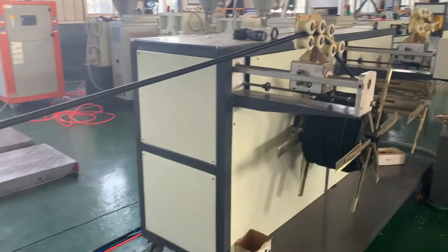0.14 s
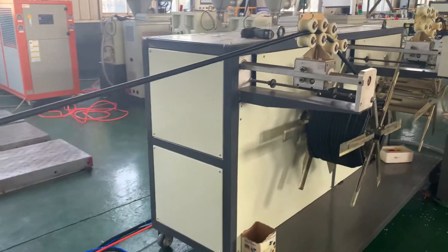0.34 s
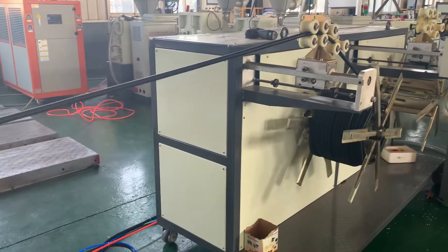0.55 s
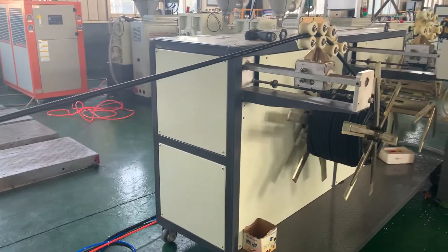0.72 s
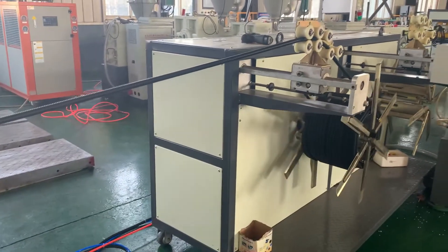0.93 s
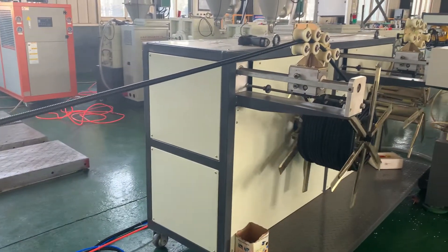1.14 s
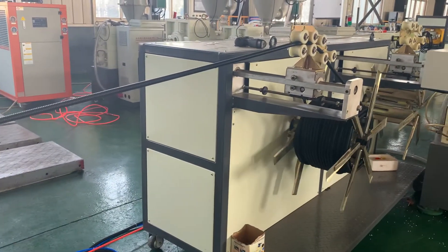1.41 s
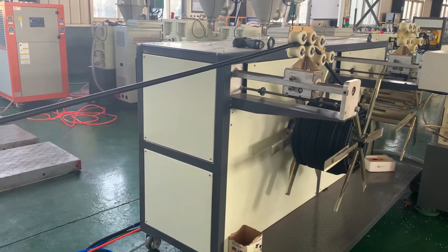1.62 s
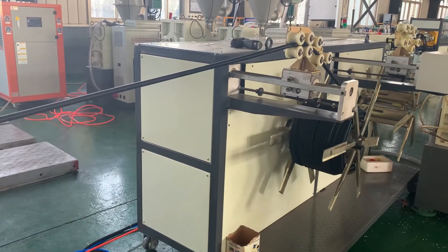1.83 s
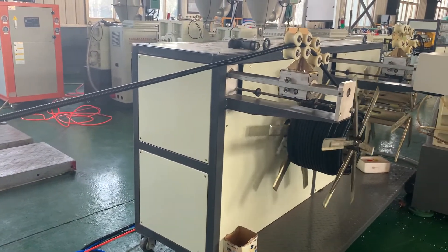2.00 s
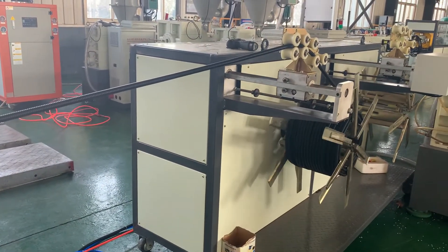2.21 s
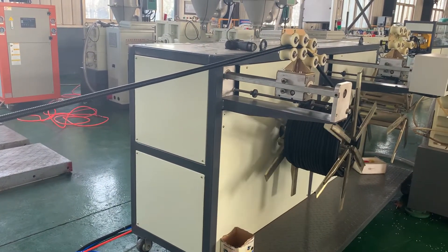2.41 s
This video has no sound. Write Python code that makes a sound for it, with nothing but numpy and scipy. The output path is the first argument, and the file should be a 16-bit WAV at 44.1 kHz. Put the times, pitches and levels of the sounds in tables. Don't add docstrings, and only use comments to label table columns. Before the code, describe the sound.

Factory machine line drones with airy roar, low motor hum and thin whine; a metal cutter clacks once

```python
import sys
import numpy as np
from scipy import signal
from scipy.fft import rfft, irfft, next_fast_len
from scipy.io import wavfile
from scipy.ndimage import uniform_filter1d, map_coordinates

SR = 44100
rng = np.random.default_rng(int(sys.argv[2]) if len(sys.argv) > 2 else 0)


def master(y):
    cut = np.clip(np.atleast_2d(y).T, -1, 1)
    pcm = np.round(cut * 32767)
    wavfile.write(sys.argv[1], SR, pcm.astype(np.int16))


def gain_from_db(level_db):
    decades = np.asarray(level_db, float) / 20
    return 10 ** decades


N = 112455
TOP_HZ = 12560
SIDES = np.array([[.5], [-.5]])


def unit(x):
    return x / np.sqrt(np.mean(x ** 2) + 1e-20)


def along(points, hz):
    f, v = np.transpose(points)
    return np.interp(np.log(hz + 1), np.log(f + 1), v)


def wobble(rate):
    knots = rng.standard_normal(int(N * rate / SR) + 4)
    return map_coordinates(knots, [np.arange(N) * rate / SR])


def filtered(x, response):
    m = next_fast_len(x.shape[-1] + SR // 4)
    spectrum = rfft(x, m) * response(np.fft.rfftfreq(m, 1 / SR))
    return irfft(spectrum, m)[..., :x.shape[-1]]


def tone(hz, db, lead, drift, pan_db=0):
    phase = 2 * np.pi * hz * np.arange(N) / SR + drift * wobble(4.81) + 2 * np.pi * rng.random()
    return np.sqrt(2) * gain_from_db(db + SIDES * pan_db) * np.sin(phase + SIDES * lead)


def motors():
    t = np.arange(N) / SR
    # time in seconds, levels of third-order hum, sixth-order hum, pump and gear whine in dB.
    tones = [(0, -28, -39, -32, -60), (.15, -31, -34, -37, -48.5), (.3, -33.5, -34.5, -52, -59),
             (.45, -27, -30.5, -41, -46), (.6, -32, -34.5, -40, -45), (.75, -35.5, -36.5, -34.5, -42),
             (.9, -37, -43, -39, -44.5), (1.05, -36, -42, -48, -40.5), (1.4, -46, -46, -38.5, -41.5),
             (1.6, -43, -38, -42, -41.5), (1.72, -40, -31, -38.5, -42), (1.9, -45, -33, -35, -39.5),
             (2.05, -41, -31, -33.5, -43), (2.3, -38, -33, -43, -42), (2.55, -35.5, -38, -36.5, -39.5)]
    tone_hz = [
        149.7,
        299.8,
        125,
        2346.6,
    ]
    tone_lead = [-.45, -.15, -.15, .2]
    # level of left over right, in dB.
    tone_pan_db = [-2.5, -4.5, -2.5, 2]
    tone_drift = [0.36, 0.08, 0.79, 0.5]
    s, *levels = np.transpose(tones)
    out = np.zeros((2, N))
    for hz, db, lead, drift, pan_db in zip(tone_hz, levels, tone_lead, tone_drift, tone_pan_db):
        out += tone(hz, np.interp(t, s, db), lead, drift, pan_db)

    # time in seconds, level in dB.
    duct = [
        (0, -42.5),
        (.5, -41),
        (.62, -39),
        (.9, -38.5),
        (1.1, -41),
        (1.25, -50),
        (1.85, -60),
        (1.95, -44),
        (2.35, -45),
        (2.55, -41),
    ]
    out += tone(739, np.interp(t, *np.transpose(duct)), lead=2.1, drift=0.72)

    # pitch of the mains hum, a far shaft, or a sideband 100 Hz below the gear whine, in Hz.
    faint_hz = [100, 732, 827, 1496, 2246.2]
    # level in dB, phase by which left leads in radians.
    faint = [(-46.5, -0.6), (-59, 1), (-57, 0), (-51, 2.5), (-45.5, 10)]
    for hz, (db, lead) in zip(faint_hz, faint):
        out += tone(hz, db + 1.6 * wobble(1.5), lead, drift=3.14)
    return out


def inverter():
    carrier_hz, carrier_lead, shaft_hz = 8000, 1.7, 23.5
    t = np.arange(N) / SR
    # time in seconds, carrier level in dB, depth of the shaft beat from 0 to 1.
    sing = [(0, -47, 0.4), (.2, -49.5, 0.1), (.3, -44, 0.4), (.42, -50, 0.6), (.6, -44.5, 0.65),
            (.72, -48, 0.2), (.8, -49, 0.2), (.9, -50.5, 0.7), (1.0, -46, 1), (1.2, -46.5, 0.36),
            (1.4, -47.5, 0), (1.7, -47, 0), (1.85, -47.5, 1), (2.1, -46.5, .6), (2.33, -44, 0.3),
            (2.55, -46.5, .7)]
    # offset from the carrier in Hz, level relative to the carrier in dB.
    sidebands = [(-47, -15), (-23.5, -9), (23.5, -13), (47, -16), (188, -17), (214, -15), (-214, -24),
                 (306, -20), (931, -16)]
    s, level_db, depth = np.transpose(sing)
    level_db = np.interp(t, s, level_db)
    depth = np.interp(t, s, depth)
    turn = 2 * np.pi * shaft_hz * t + 1.03 * wobble(5.47)
    carrier = tone(carrier_hz, level_db + 2 * wobble(20), carrier_lead, drift=1.1)
    out = (1 + depth * np.cos(turn)) * carrier
    for hz, db in sidebands:
        out += tone(carrier_hz + hz, level_db + db + 3 * wobble(9), carrier_lead, drift=1.2)
    return out


def cutter():
    # time in seconds, level in dB, favoured mode in Hz.
    contacts = [(1.9725, -32, 9860), (1.9738, -12, 3450), (1.978, -10.5, 3450), (1.982, -12, 3950),
                (1.9861, -14, 4865), (1.99, -25.5, 4780), (2, -35, 4865), (2.014, -32, 3970),
                (2.016, -25, 9900), (2.027, -20.5, 9860), (2.036, -25.5, 9860), (2.059, -23.5, 9860),
                (2.063, -22, 4000), (2.07, -26.5, 8600), (2.115, -42, 4000)]
    # pitch of a mode of the steel, in Hz.
    steel_hz = [3450, 3950, 4330, 4865, 5670, 6160, 8600, 9860, 10400, 10630, 11300]
    # level in dB, 60 dB decay time in seconds, phase by which left leads in radians.
    steel = [(-8.5, 0.017, 0), (-5, 0.029, 1.2), (-6, 0.051, 3.6), (-7, 0.057, 1.5), (-12, 0.031, -3),
             (-2, 0.052, -2), (-5.5, 0.046, 1.5), (1, 0.042, -5), (1, 0.022, -4.5), (-6, 0.026, 4.5),
             (-17, 0.031, 7)]
    # frequency in Hz, level of the crack in dB.
    crack_db = [(1500, -27), (2800, -3.5), (5000, 1), (7200, -13), (8300, -0.5), (10700, -1), (11700, -11),
                (12400, -46)]
    favour_db, favour_width = 9, .07
    detune, bite_s, crack_t60 = .005, .0008, 0.053
    out = np.zeros((2, 2, N + SR))
    t = np.arange(SR // 4) / SR
    for s, db, favoured_hz in contacts:
        ring = np.zeros((2, len(t)))
        for hz, (level, t60, lead) in zip(steel_hz, steel):
            lift_db = favour_db * np.exp(-(np.log(hz / favoured_hz) / favour_width) ** 2)
            decay = gain_from_db(level + lift_db + rng.normal(0, 2.0) - 60 * t / t60)
            turns = hz * rng.normal(1, detune) * t + rng.random()
            ring += decay * np.sin(2 * np.pi * turns + SIDES * lead)
        burst = gain_from_db(-60 * t / crack_t60) * rng.standard_normal((2, len(t)))
        crack = filtered(burst, lambda hz: gain_from_db(along(crack_db, hz)))
        bite = gain_from_db(db) * (1 - np.exp(-t / bite_s))
        out[..., round(s * SR):][..., :len(t)] += bite * np.array([gain_from_db(-10) * ring, gain_from_db(-3.5) * crack])
    return out[..., :N]


def hall(x):
    delay_s = .012
    # frequency in Hz, 60 dB decay time in seconds.
    decay = [(2000, 0.99), (5000, 0.54), (8000, 0.75), (11000, 0.61)]
    hz, t, z = signal.stft(rng.standard_normal((2, SR)), SR, nperseg=256)
    tail = signal.istft(z * gain_from_db(-60 * t / along(decay, hz)[:, None]), SR, nperseg=256)[1]
    late = np.pad(x, ((0, 0), (round(delay_s * SR), 0)))
    return signal.fftconvolve(late, tail / np.linalg.norm(tail[0]), axes=1)[:, :N]


def clanks():
    # time in seconds, pitch in Hz, level in dB, length in seconds.
    knocks = [(0.061, 640, -31, 0.043), (0.068, 1452, -34, 0.028), (.21, 645, -32, .025),
              (0.215, 976, -33, 0.023), (0.277, 1162, -39, 0.037), (0.284, 1940, -40, 0.023),
              (0.297, 645, -29, 0.026), (.311, 1464, -38.5, 0.036), (0.331, 1906, -37.5, 0.023),
              (0.395, 1520, -32.5, 0.016), (0.462, 1173, -33.5, .02), (0.634, 1525, -38.5, 0.035),
              (0.637, 1185, -31, .02), (0.682, 990, -33, 0.037), (0.796, 1808, -33.5, .01),
              (0.809, 1510, -33.5, 0.017), (1.18, 943, -36, 0.039), (1.656, 640, -34, 0.048),
              (1.834, 910, -38, .02), (1.884, 875, -33, 0.026), (2.03, 2196, -31.5, 0.0074),
              (2.117, 740, -35, 0.024), (2.188, 600, -32.5, 0.076), (2.357, 874, -37.5, 0.021)]
    lead_scatter = 0.75
    t = np.arange(N) / SR
    out = np.zeros((2, N))
    for s, hz, db, length in knocks:
        turn, way = rng.standard_normal(2)
        swell = np.sqrt(2) * gain_from_db(db) * np.exp(-(2 * (t - s) / length) ** 2)
        out += swell * np.sin(2 * np.pi * hz * t + 2 * turn + lead_scatter * way * SIDES)
    return out


def rush(spectrum, alike, patchy_db):
    z = signal.stft(rng.standard_normal((2, N)), nperseg=512)[2]
    field = uniform_filter1d(rng.standard_normal(z.shape[1:]), size=5, axis=0)
    field = uniform_filter1d(field, size=12, axis=1)
    pair = signal.istft(z * gain_from_db(patchy_db * unit(field)), nperseg=512)[1][:, :N]

    def mid_side_response(hz):
        turn = np.arccos(np.clip(along(alike, hz), -1, 1)) / 2
        return gain_from_db(along(spectrum, hz)) * [np.cos(turn), np.sin(turn)]

    mid, side = filtered(pair, mid_side_response)
    return np.array([mid + side, mid - side]) / np.sqrt(np.mean(mid ** 2))


def casings(hz):
    # centre in Hz, width in Hz.
    bands = [(402, 14), (640, 45), (732, 18), (865, 35), (985, 25), (1150, 30), (1248, 14), (1355, 14),
             (1490, 40), (1900, 70), (2010, 25)]
    bumps = sum(np.exp(-((hz - c) / w) ** 2) for c, w in bands)
    return gain_from_db(3.5 * (bumps - 0.3356))


def air():
    # frequency in Hz, spectral level in dB per Hz; likewise for the hiss and the rumble.
    roar_db = [(88, -45), (98, -3.5), (135, -1), (210, -2), (370, -1.5), (800, -8.5), (2330, -14.5),
               (2450, -13.5)]
    hiss_db = [(2350, -39), (2440, 5), (3500, 0), (5000, -6.5), (6300, -10), (8000, -7.5), (10000, -13.5),
               (12000, -15)]
    rumble_db = [(13, -46), (22, -27), (30, -13), (47, -8.5), (59, 0), (76, -7.5), (92, -4), (120, -43),
                 (200, -120)]
    # frequency in Hz, left-right likeness from -1 to 1.
    alike = [(40, .997), (65, .96), (130, .87), (270, .68), (580, .26), (1240, .02), (2600, -.05)]
    roar = rush([(60, -120), *roar_db, (2650, -120)], alike, patchy_db=1.3)
    roar = gain_from_db(-27.4 + .3 * wobble(3.72) - 0.04 * SIDES) * filtered(roar, casings)
    hiss = rush([*hiss_db, (TOP_HZ, -120)], [(3000, -.05)], patchy_db=2.0)
    hiss = gain_from_db(-42.5 + 0.2 * wobble(17.0)) * hiss
    return roar + hiss + gain_from_db(-44.5) * rush(rumble_db, alike, patchy_db=-1.0)


def scene():
    ring, crack = cutter()
    answer = gain_from_db(-0.1) * hall(crack + gain_from_db(-8) * ring)
    return air() + motors() + inverter() + clanks() + ring + crack + answer


def discard(pair):
    follow, scatter_db, blow_db = .72, 4.2, 17
    offset = 880
    # lower edge in Hz, mid threshold in dB, side threshold in dB, over the local level.
    thresholds = [(0, -30, -30), (1000, -9.5, -12), (1450, -7.5, -11), (1900, -6, -10), (2430, 2, -7),
                  (3400, -2.5, -2.5), (4400, -2, 3.5), (5400, 0, -1), (6150, 5, -1.5), (6500, 12.5, -1.5),
                  (7600, -1, -1.5), (7820, -14, -6), (8190, -2, -1.5), (8300, 0, 5), (8600, .5, 15),
                  (10250, 3, 1), (10700, 8, .5), (11050, 20, 0), (11800, 20, 8), (12150, 20, 20)]
    padded = np.pad(pair, ((0, 0), (offset, 0)))
    hz, _, z = signal.stft(padded, SR, window="cosine", nperseg=2048)
    local = np.log(uniform_filter1d(np.abs(z) ** 2, size=15, axis=1) + 1e-20) / 2
    usual = np.median(local, axis=2, keepdims=True)
    rise = local - usual

    start, *limit_db = np.transpose(thresholds)
    limit_db = np.array(limit_db)[:, np.searchsorted(start, hz, "right") - 1, None]
    chance = rng.standard_normal((2, len(hz) // 14 + 1, z.shape[2]))
    chance = unit(uniform_filter1d(chance, size=2))
    limit_db = limit_db + scatter_db * np.repeat(chance, 14, axis=1)[:, :len(hz)]

    treble = (hz > 3000) & (hz < TOP_HZ)
    blow = rise[:, treble].mean(axis=(0, 1)) > np.log(gain_from_db(blow_db))
    keep = blow | (np.abs(z) > gain_from_db(limit_db) * np.exp(usual + follow * rise))
    return signal.istft(z * keep, SR, window="cosine", nperseg=2048)[1][:, offset:offset + N]


def low_pass(x):
    return signal.sosfilt(signal.butter(12, 12560, fs=SR, output="sos"), x)


def record(dry):
    left, right = dry
    mid_side = np.array([left + right, left - right]) / 2
    mid, side = discard(filtered(mid_side, lambda hz: hz < TOP_HZ))
    return low_pass(np.array([mid + side, mid - side]))


dry = scene()
out = record(dry)
master(out)
```